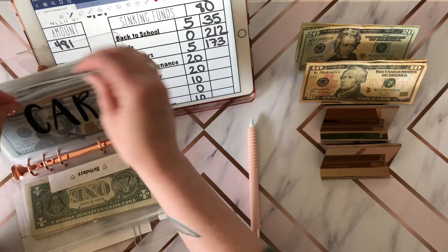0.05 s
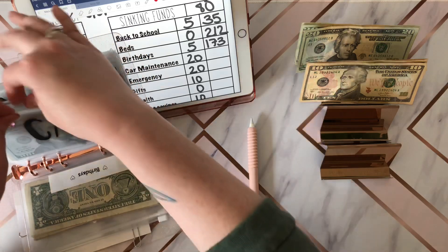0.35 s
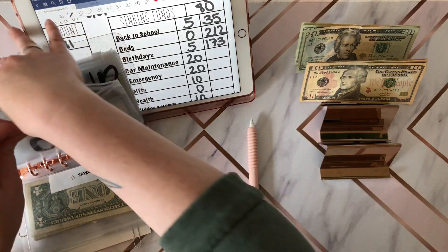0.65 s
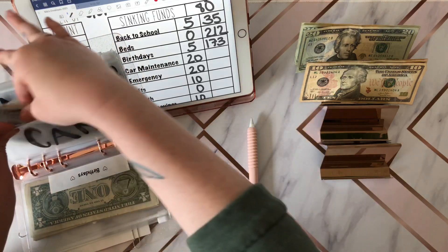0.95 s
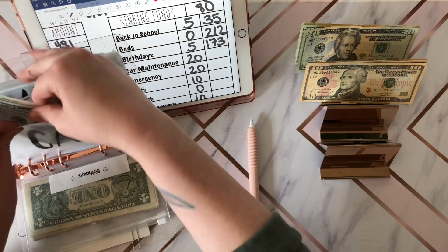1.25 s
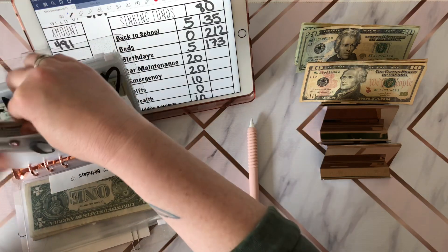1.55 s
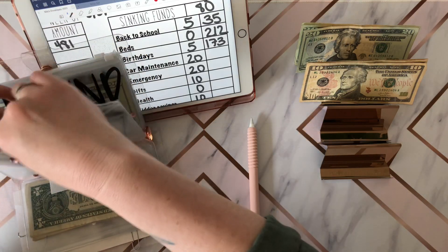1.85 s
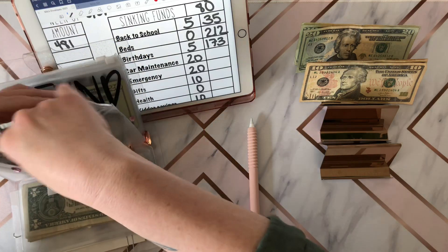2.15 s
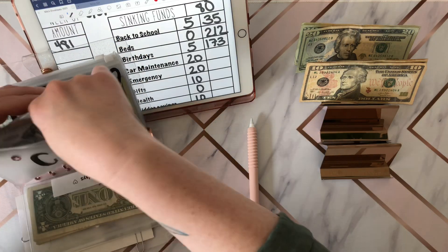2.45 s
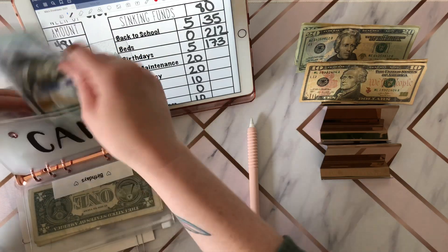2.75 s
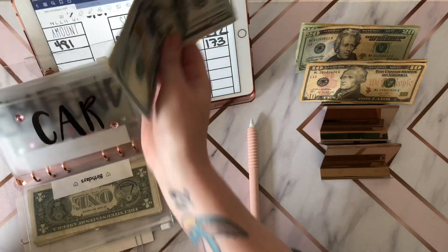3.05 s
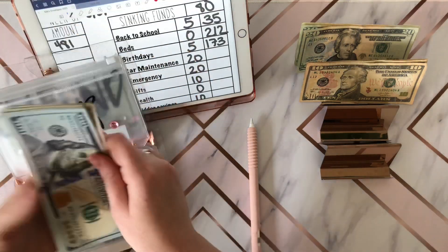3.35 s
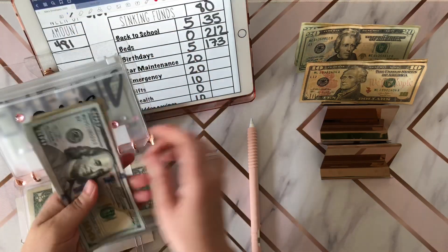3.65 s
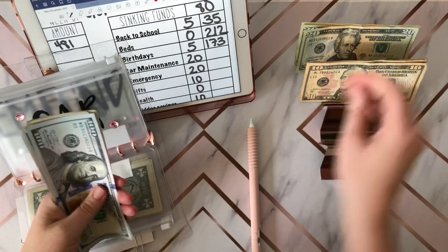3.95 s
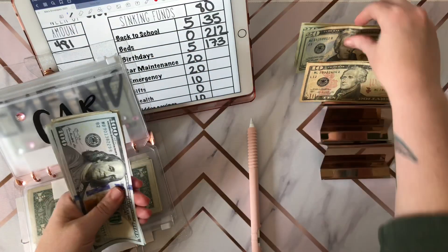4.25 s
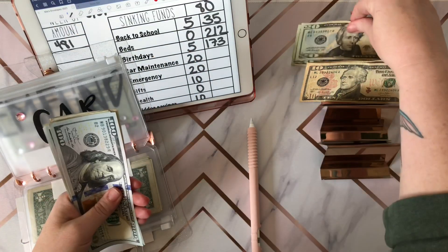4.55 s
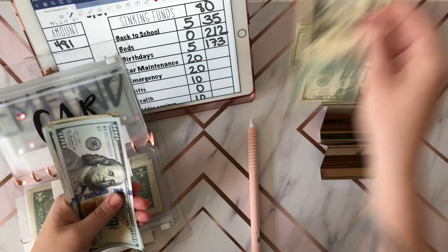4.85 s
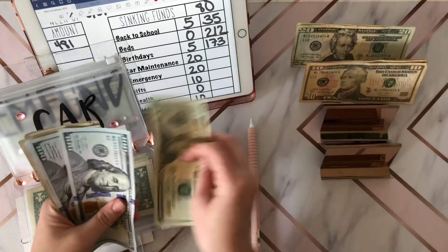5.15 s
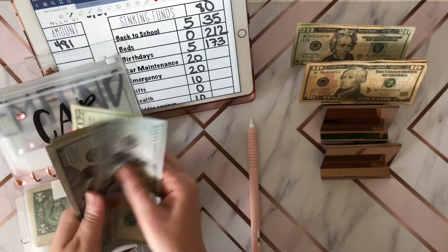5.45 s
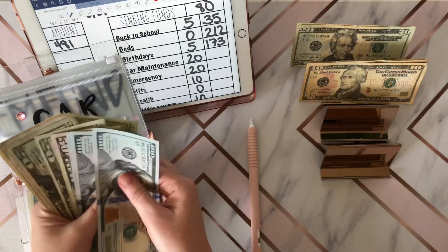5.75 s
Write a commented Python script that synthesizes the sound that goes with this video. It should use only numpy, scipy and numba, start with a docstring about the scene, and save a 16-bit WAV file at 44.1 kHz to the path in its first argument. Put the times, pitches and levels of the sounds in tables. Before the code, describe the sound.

A plastic envelope rustles and crackles softly as banknotes are pulled out, then the paper bills slide and flick together.

```python
"""A plastic zipper envelope hisses and crackles in a ring binder as banknotes are pulled from it;
then the notes are picked up and gathered into a stack. Sliding sheets hiss with tiny stick-slip
grains, creases snap through, and the fingers bump the binder and the table.
A small quiet room, one microphone close to the hands."""
import sys
import numpy as np
from scipy import signal
from scipy.fft import rfft, irfft
from scipy.io import wavfile
from scipy.ndimage import uniform_filter1d, map_coordinates
from numba import njit

SR = 44100
rng = np.random.default_rng(int(sys.argv[2]) if len(sys.argv) > 2 else 0)


def put_to_file(sound):
    """Save the sound as 16-bit audio at rate SR, in the file named by the first command-line argument."""
    columns = np.atleast_2d(sound).T  # one column per channel
    safe = np.clip(columns, -1, 1)
    whole_steps = np.round(safe * 32767)
    wavfile.write(sys.argv[1], SR, whole_steps.astype(np.int16))


N = 255017
TIME = np.arange(N) / SR

# Levels in the tables are relative: each layer sets its own gain.
# Spectra of the room's still air and of its reflections: frequency_hz, level_db
AIR_SPECTRUM = [(15, -67), (25, -5), (53, -7.5), (84, -4.5), (141, -8), (249, -9), (384, -14), (439, -12),
                (607, -17.5), (714, -20), (775, -16.5), (840, -18.5), (1520, -24), (11600, -34),
                (16000, -35)]
WALL_SPECTRUM = [(100, -0.5), (500, -2.5), (1500, -4.5), (5000, -4.5), (10000, -17), (16000, -3)]
# Fingers and sheets bumping the binder and table: start_s, peak_db, pitch_hz
FINGER_BUMPS = [(0.426, -45.5, 312), (0.809, -43, 167), (1.205, -53, 256), (1.356, -48.5, 244),
                (2.295, -50, 190), (2.333, -41.5, 320), (2.5754, -32, 275), (2.615, -56, 180),
                (2.848, -54, 140), (2.894, -52.5, 145), (4.204, -51, 220), (4.318, -51, 200),
                (4.402, -53.5, 252), (4.619, -53, 188), (4.745, -45, 260), (4.763, -40, 300),
                (4.868, -37, 400), (4.927, -52.5, 300), (5.192, -50.5, 334), (5.312, -48.5, 370),
                (5.385, -41.5, 365)]
# Strokes in which a sheet's edge drags and sings: peak_s, rise_s, fall_s, pitch_hz, level_db
EDGE_STROKES = [(.58, 0.057, 0.0089, 854, -64.5), (.86, .12, 0.085, 1655, -57),
                (1.01, 0.031, 0.036, 1530, -61.5), (1.95, 0.054, .069, 1700, -74.5),
                (2.791, .039, 0.018, 1180, -57), (4.41, 0.035, 0.032, 6000, -58),
                (4.42, 0.053, 0.1, 8160, -62), (5.09, 0.034, 0.048, 3200, -60),
                (5.46, 0.02, 0.054, 2230, -64), (5.555, 0.026, .016, 5440, -55),
                (5.62, 0.049, 0.012, 1260, -56)]
# The loudest creases snapping in the plastic, and creases and edges flicking in the notes:
# time_s, level_db, pitch_hz, spread_octaves, crackle_db (relative to the click)
PLASTIC_CREASES = [(.1365, -56, 1410, 1.4, 4), (.3841, -52.5, 3940, 1.9, 19), (.4225, -39, 1330, 0.25, 0.5),
                   (.7822, -47, 1740, 0.56, 0), (.7936, -33.5, 4280, 0.62, -5),
                   (.8056, -41.5, 2800, 0.77, 4), (.8164, -35.5, 2550, 0.91, -6),
                   (1.0868, -59.5, 1740, 1.1, 12), (1.2003, -42.5, 1500, 0.66, 2.5),
                   (1.3359, -49.5, 1900, 0.98, -1), (1.3553, -49, 1770, 0.88, 6),
                   (1.4219, -54, 1790, .35, 0), (1.445, -48.5, 3630, 1.6, 2), (1.4521, -43, 8800, 0.41, 1),
                   (1.5416, -55.5, 3160, 0.46, 17), (1.7885, -49.5, 2060, 0.77, -10),
                   (2.2547, -41.5, 2570, 0.73, -7), (2.2575, -40.5, 2690, 1, -6),
                   (2.2634, -34.5, 2680, 0.37, -9), (2.3324, -53, 1580, 1, -4),
                   (2.4407, -48, 1900, 1.3, -1), (2.5412, -44, 3300, 0.35, 6),
                   (2.5737, -28, 4650, 0.37, -9), (2.6346, -41.5, 1040, 0.25, -9),
                   (2.8452, -50, 2500, 0.84, -9), (2.8909, -54, 2340, 1.2, -4),
                   (2.9195, -53, 2160, 0.62, 7), (2.94, -55, 5190, 0.93, 5), (2.963, -49, 2810, 2.1, 3)]
PAPER_FLICKS = [(3.3877, -50, 7080, 1.6, 12), (3.4236, -50.5, 4240, 1.06, -8),
                (3.7745, -60.5, 1780, 1.5, -2), (3.8556, -66, 11400, 0.63, -8),
                (4.2245, -52, 5410, 0.76, 9), (4.272, -55, 4020, 1.6, 14), (4.312, -52.5, 2510, 2.5, 1),
                (4.4391, -46.5, 4100, 0.27, -16), (4.6625, -52, 4370, 4.4, 8), (4.7432, -49, 1720, 1, 10),
                (4.7633, -36.5, 1400, 0.89, 15), (4.7877, -39.5, 3250, 1.05, 1),
                (4.8635, -41.5, 1600, 0.78, 10), (4.8835, -41, 1760, 0.57, 4),
                (4.9816, -44, 1120, 0.34, -2), (5.0798, -39, 1370, 0.93, 14),
                (5.172, -49.5, 1170, 0.88, 12), (5.3121, -39.5, 1290, 0.72, -5),
                (5.3621, -44, 4560, 0.46, 7), (5.3851, -42.5, 1850, 0.76, 2), (5.553, -39, 5600, 0.79, 0)]
# Main resonance of each sheet, moving as it is bent and gripped: time_s, pitch_hz
PLASTIC_RESONANCE = [(.45, 1470), (.58, 1120), (.74, 1730), (1.0, 1580), (2.1, 1570), (2.45, 1360),
                     (2.66, 1160), (2.8, 1250), (3.0, 1490)]
PAPER_RESONANCE = [(3.3, 2190), (3.7, 2260), (4.3, 1630), (4.599, 1610), (4.95, 1100), (5.2, 1050),
                   (5.45, 1070), (5.57, 1230), (5.64, 1010), (5.77, 1250)]
# Spectrum of the friction: frequency_hz, level_db
PLASTIC_SPECTRUM = [(150, -5.5), (430, -6), (800, 0), (1500, 2), (2100, 1), (2900, -3.5), (3700, -5.5),
                    (4900, 1.5), (6000, -9), (8500, -13.5), (10500, -20.5), (16000, -20)]
PAPER_SPECTRUM = [(150, -11.5), (500, -0.5), (850, 3), (1800, 1.5), (2400, 3.5), (2800, -4), (3400, -4),
                  (4400, 1), (5300, 2), (6500, -4.5), (9000, -5.5), (12000, -11), (16000, -12)]
# The envelope sliding under the fingers, and the notes over each other:
# start_s, attack_s, length_s, hiss_db, body_db, sizzle_db (the last two relative to the hiss)
PLASTIC_SLIDES = [(0, 0.0021, 0.37, -71.5, 2.5, -1.5), (.11, .025, 0.032, -66, -1, -10),
                  (.355, .05, 0.14, -59.5, 3, -7.5), (.47, .08, .14, -59, -1, -6),
                  (.655, .14, .215, -51, -0.5, -3.5), (.88, 0.12, .145, -60.5, 3, -9),
                  (1.05, 0.041, .14, -75, 10, -6), (1.195, 0.018, 0.072, -65, 6, -8),
                  (1.265, 0.038, .09, -61, 2, 0), (1.41, 0.022, .14, -66.5, 3.5, -4),
                  (1.58, 0.043, .075, -74, 3, 5.5), (1.762, .015, .04, -68.5, 5, -8),
                  (1.85, .09, .38, -65, 1.5, -2.5), (2.255, .01, 0.055, -57, 8, -5.5),
                  (2.32, 0.018, .07, -64.5, -1, -8), (2.385, .055, .155, -55, 0, -5.5),
                  (2.52, 0.059, .085, -47, 2, -1.5), (2.63, .03, 0.21, -58.5, -1, -1.5),
                  (2.86, 0.054, .12, -63, 3.5, -6)]
PAPER_SLIDES = [(3.248, 0.0092, .035, -59, -5.5, -0.5), (3.28, .04, .16, -64, -6, -3),
                (3.46, 0.07, .105, -58, -7, -3), (3.58, 0.027, .105, -66.5, -4, -1.5),
                (3.93, 0.023, 0.031, -71, 1.5, -4), (4.19, .01, .15, -66.5, 6, 1.5),
                (4.35, 0.065, .09, -50.5, -8.5, -4.5), (4.44, .02, .18, -59, -5.5, -5.5),
                (4.66, 0.03, 0.089, -70.5, 1.5, -1), (4.74, 0.033, .17, -57.5, 1, -4.5),
                (4.89, .07, .155, -57.5, -6.5, -0.5), (5.065, 0.024, .09, -55.5, -2, -1),
                (5.16, .025, .115, -57, -4.5, -7), (5.31, 0.0072, 0.065, -52, -7.5, -5.5),
                (5.382, 0.025, .088, -43, -9, -2), (5.5, .05, .07, -40, -13, -6),
                (5.575, .035, 0.074, -41, -6, -5.5), (5.708, .035, .06, -46.5, -4.5, -3)]


def undb(db):
    """Decibels to gain."""
    return 10 ** (np.asarray(db) / 20)


def unit(x):
    """Scale to an rms of one."""
    return x / np.sqrt(np.mean(x ** 2))


def add(out, start_s, sound):
    """Mix a sound in at start_s."""
    i = max(int(round(start_s * SR)), 0)
    out[i:i + len(sound)] += sound[:max(N - i, 0)]


def fade(t60_s, size):
    """Exponential decay, 60 dB down after t60_s."""
    return np.exp(-np.log(1000) * np.arange(size) / SR / t60_s)


def colour(x, spectrum):
    """Shape a sound by points of frequency_hz, level_db."""
    hz, db = np.transpose(spectrum)
    bins_hz = np.maximum(np.fft.rfftfreq(len(x), 1 / SR), 1)
    gain = undb(np.interp(np.log(bins_hz), np.log(hz), db))
    return irfft(rfft(x) * gain, len(x))


def band(x, low_hz, high_hz):
    """Butterworth band-pass."""
    return signal.sosfilt(signal.butter(3, [low_hz, high_hz], "band", fs=SR, output="sos"), x)


def wander(rate_hz):
    """Random levels held for 1 / rate_hz seconds and smoothed twice, with an rms of one."""
    hold = int(SR / rate_hz)
    steps = rng.standard_normal(N)[np.arange(N) // hold]
    return unit(uniform_filter1d(uniform_filter1d(steps, hold), hold))


@njit
def resonate(x, centre_hz, width_hz):
    """State-variable band-pass whose centre can move every sample."""
    out, band_state, low_state = np.empty(len(x)), 0., 0.
    for i in range(len(x)):
        tuning, damping = np.tan(np.pi * centre_hz[i] / SR), width_hz / centre_hz[i]
        passed = (band_state + tuning * (x[i] - low_state)) / (1 + tuning * (tuning + damping))
        band_state = 2 * passed - band_state
        low_state += 2 * tuning * passed
        out[i] = damping * passed
    return out


def knock(push, pitch_hz, octaves, skirt_db, size=2048):
    """A heavily damped patch answers a push with one broad spectral hump around pitch_hz."""
    bins_hz = np.maximum(np.fft.rfftfreq(size, 1 / SR), 20)
    away = np.log2(bins_hz / pitch_hz) / octaves
    gain = undb(-skirt_db * (np.hypot(1, away) - 1)) / np.sqrt(bins_hz + pitch_hz / 2)
    # minimum phase: nothing sounds before the push
    cepstrum = irfft(np.log(gain))
    cepstrum[1:size // 2] *= 2
    cepstrum[size // 2 + 1:] = 0
    response = irfft(np.exp(rfft(cepstrum)))
    return signal.fftconvolve(push, response)[:len(push)]


def room_tone(air_db, drone_hz, drone_width_hz, drone_db):
    """The quiet room behind the hands: steady air noise with a low, wavering drone."""
    drone = resonate(rng.standard_normal(N), np.full(N, drone_hz), drone_width_hz)
    air = band(colour(rng.standard_normal(N), AIR_SPECTRUM), 30, 19000)
    return undb(air_db) * unit(air) + undb(drone_db) * unit(drone)


def room_reflections(x, wet_db, t60_s, size=22050):
    """The table and walls send a faint, short tail back to the close microphone."""
    tail = colour(rng.standard_normal(size), WALL_SPECTRUM) * fade(t60_s, size)
    tail[:SR // 300] = 0  # the direct sound leads by about 3 ms
    return x + undb(wet_db) * signal.fftconvolve(x, unit(tail) / np.sqrt(size))[:N]


def near_reflections(x, echo_db, sway, sway_hz):
    """Hands and table reflect within a few ms; the paths, and so the colour, shift as the hands move."""
    out = x.copy()
    for lag_s in np.geomspace(.0003, .0022, 4):
        delay = lag_s * SR * np.exp(sway * wander(sway_hz))
        out += undb(echo_db) * map_coordinates(x, [np.arange(N) - delay], order=3)
    return unit(out)


def bumps(gain_db, flutter_db, flutter_cycles, soft_bump_db, size=8192):
    """A soft push into the binder and table, followed by the dull flutter of the pages."""
    out = np.zeros(N)
    for start_s, peak_db, pitch_hz in FINGER_BUMPS:
        # the pages can only flutter so much: their share drops as the bump gets harder
        share_db = flutter_db - .52 * (peak_db - soft_bump_db)
        push = undb(share_db) * unit(rng.standard_normal(size) * fade(flutter_cycles / pitch_hz, size))
        push[0] = np.sqrt(size)  # the impact, an impulse with an rms of one
        thud = knock(push, pitch_hz, octaves=.96, skirt_db=14)
        add(out, start_s, undb(peak_db + gain_db) * thud / np.abs(thud).max())
    return out


def edge_scrapes(gain_db, flutter_db, relative_width):
    """Each stroke swells and dies in a narrow band, fluttering as the edge catches."""
    out = np.zeros(N)
    drag = rng.standard_normal(N) * undb(flutter_db * wander(rate_hz=90))
    for peak_s, rise_s, fall_s, pitch_hz, level_db in EDGE_STROKES:
        swell = np.exp(-((TIME - peak_s) / np.where(TIME < peak_s, rise_s, fall_s)) ** 2)
        centre_hz, width_hz = np.full(N, float(pitch_hz)), relative_width * pitch_hz
        singing = resonate(resonate(drag, centre_hz, width_hz), centre_hz, width_hz)
        out += undb(level_db + gain_db) * swell * unit(singing)
    return out


def disperse(click, lag_s):
    """Bending waves cross a sheet at a speed growing as the root of pitch; 1 kHz takes lag_s."""
    khz = np.fft.rfftfreq(len(click), 1000 / SR)
    phase = 4 * np.pi * 1000 * lag_s * np.sqrt(khz)
    return irfft(rfft(click) * np.exp(-1j * phase), len(click))


def snaps(rows, gain_db, skirt_db, crackle_t60_s, ring_db, ring_t60_s, lag_s=.0011, size=4096):
    """A crease buckles in a click that chirps down, smaller folds follow, and the sheet rings on."""
    out = np.zeros(N)
    for time_s, level_db, pitch_hz, octaves, crackle_db in rows:
        fold_noise, ring_noise = rng.standard_normal((2, size))
        folds = unit(fold_noise * np.abs(fold_noise) * fade(crackle_t60_s, size))
        ring = unit(ring_noise * fade(ring_t60_s, size))
        push = undb(crackle_db) * folds + undb(ring_db) * ring
        push[0] = np.sqrt(size)  # the buckle itself
        click = knock(push, pitch_hz, octaves, skirt_db)
        onset_rms = np.sqrt(np.mean(click[:SR // 200] ** 2))  # first 5 ms
        click *= undb(level_db + gain_db) / onset_rms
        travel_s = lag_s * np.sqrt(1000 / pitch_hz)
        add(out, time_s - travel_s, disperse(click, lag_s))
    return out


def crinkles(gains, count, offset_db, scatter_db, centre_hz, octaves, crackle_db=3):
    """Small creases give way at random, denser and louder in a strong slide; returns rows for snaps."""
    hiss = gains[0]
    travelled = np.cumsum(np.sqrt(hiss))
    when, strength, pitch = rng.random((count, 3)).T
    at = np.searchsorted(travelled, when * travelled[-1])
    levels_db = 20 * np.log10(hiss[at]) + offset_db + scatter_db * (strength - .5)
    pitches_hz = centre_hz * 2 ** (2 * pitch - 1)
    return [(s, db, hz, octaves, crackle_db) for s, db, hz in zip(TIME[at], levels_db, pitches_hz)]


def slide_gains(slides, sag_db_per_s=22.5, release_db_per_s=227.5):
    """Hiss, body and sizzle gains: a slide swells, sags as the hand slows and dies when it stops."""
    power = np.full((3, N), 1e-14)
    for start_s, attack_s, length_s, hiss_db, body_db, sizzle_db in slides:
        age_s = TIME - start_s
        rise = np.sin(np.pi / 2 * np.clip(age_s / attack_s, 0, 1)) ** 2
        sag_db = sag_db_per_s * np.maximum(age_s - attack_s, 0)
        release_db = release_db_per_s * np.maximum(age_s - length_s, 0)
        levels = undb([hiss_db, hiss_db + body_db, hiss_db + sizzle_db])
        power += np.outer(levels, rise * undb(-sag_db - release_db)) ** 2
    return np.sqrt(power)


def rubbing(gains, resonance, spectrum, gain_db, ring_width_hz, ring_db,
            grains_per_s, grain_spread_db, judder_db, smooth_db=2):
    """Sliding sheets catch and slip in tiny grains of uneven size; the bent sheet rings with them."""
    sizes = undb(grain_spread_db * np.minimum(rng.exponential(size=N), 5))
    grains = (rng.random(N) < grains_per_s / SR) * sizes * rng.choice([-1, 1], N)
    slip = unit(grains) + undb(smooth_db) * rng.standard_normal(N)
    slip *= undb(judder_db * wander(rate_hz=110))  # the slide judders under the fingers
    slip = near_reflections(colour(slip, spectrum), echo_db=-14, sway=.15, sway_hz=11)
    ring = resonate(slip, np.interp(TIME, *np.transpose(resonance)), ring_width_hz)
    body = unit(band(slip + undb(ring_db) * ring, 87, 1870))
    hiss = unit(band(slip, 2850, 6900))
    sizzle = unit(band(slip, 7860, .45 * SR))
    return undb(gain_db) * np.sum(gains * [hiss, body, sizzle], axis=0)


def scene():
    """Close to the microphone, the envelope and then the notes; the room tone lies behind them."""
    plastic, paper = slide_gains(PLASTIC_SLIDES), slide_gains(PAPER_SLIDES)
    envelope = rubbing(plastic, PLASTIC_RESONANCE, PLASTIC_SPECTRUM, gain_db=.5, ring_width_hz=270.,
                       ring_db=-5.5, grains_per_s=1500, grain_spread_db=3, judder_db=2.37)
    notes = rubbing(paper, PAPER_RESONANCE, PAPER_SPECTRUM, gain_db=-1, ring_width_hz=330.,
                    ring_db=.5, grains_per_s=1800, grain_spread_db=2, judder_db=1.85)
    scrapes = edge_scrapes(gain_db=6.5, flutter_db=3, relative_width=.26)
    small_creases = crinkles(plastic, count=36, offset_db=-5.5, scatter_db=4,
                             centre_hz=2620, octaves=.69)
    small_flicks = crinkles(paper, count=30, offset_db=.5, scatter_db=15, centre_hz=3540, octaves=.42)
    creases = snaps(PLASTIC_CREASES + small_creases, gain_db=-1, skirt_db=4.5,
                    crackle_t60_s=.039, ring_db=-8.5, ring_t60_s=.02)
    flicks = snaps(PAPER_FLICKS + small_flicks, gain_db=-.5, skirt_db=9,
                   crackle_t60_s=.04, ring_db=-4, ring_t60_s=.026)
    thuds = bumps(gain_db=.5, flutter_db=8, flutter_cycles=26, soft_bump_db=-49.5)
    direct = envelope + notes + scrapes + creases + flicks + thuds
    handling = room_reflections(direct, wet_db=-11.5, t60_s=.45)
    background = room_tone(air_db=-67.5, drone_hz=77., drone_width_hz=12., drone_db=-74.5)
    return (handling + background)[None]


def record(dry):
    """The recorder cuts the top steeply, just under 16 kHz."""
    return signal.sosfilt(signal.ellip(10, .2, 70, 15950, fs=SR, output="sos"), dry)


dry = scene()
out = record(dry)
put_to_file(out)
```